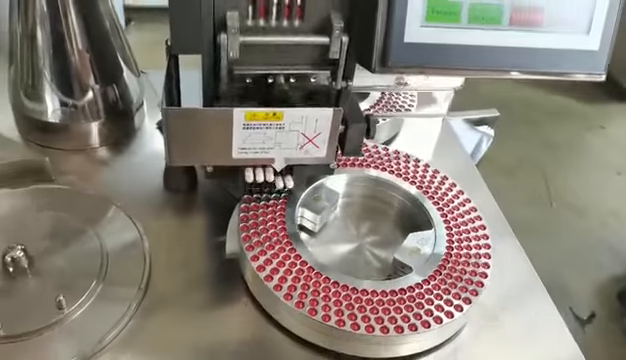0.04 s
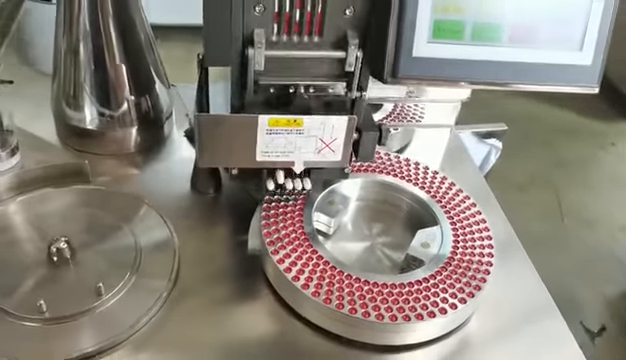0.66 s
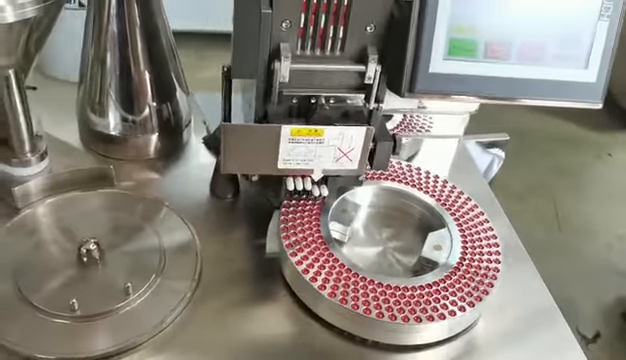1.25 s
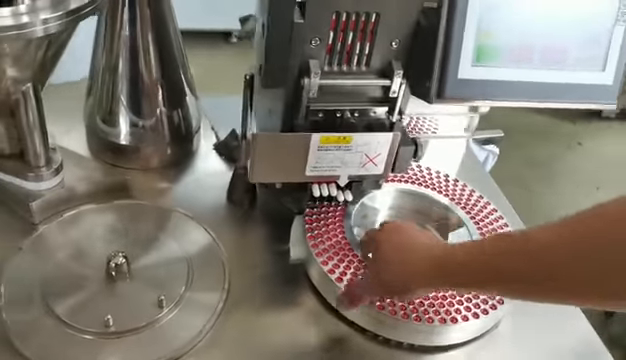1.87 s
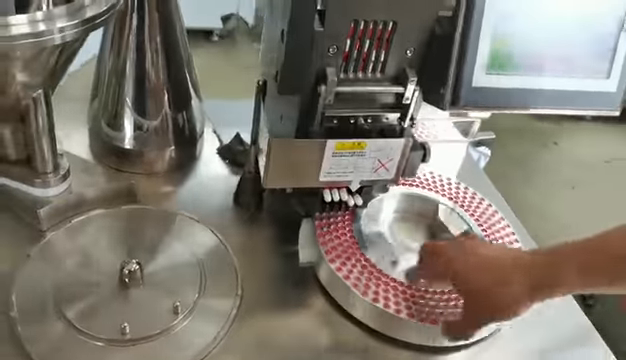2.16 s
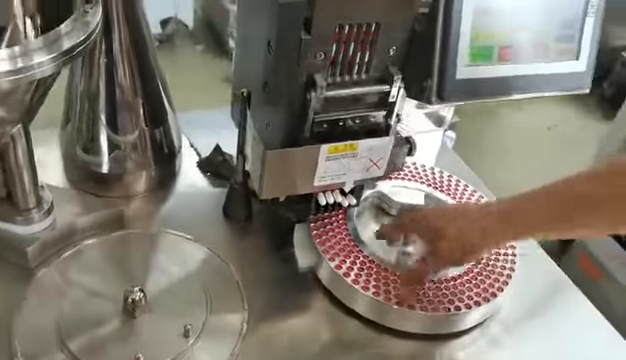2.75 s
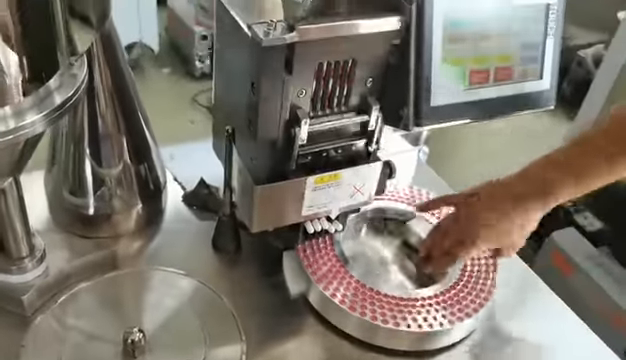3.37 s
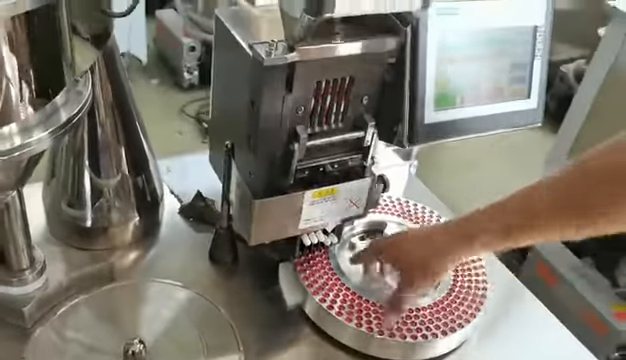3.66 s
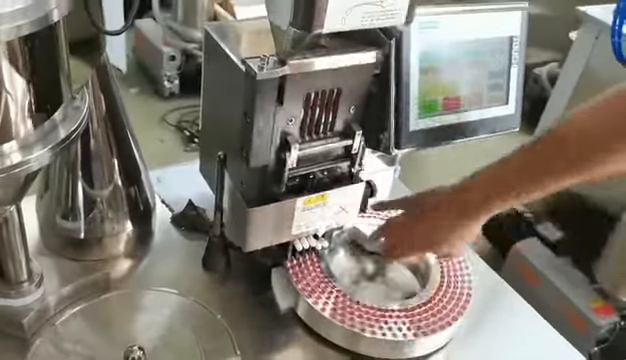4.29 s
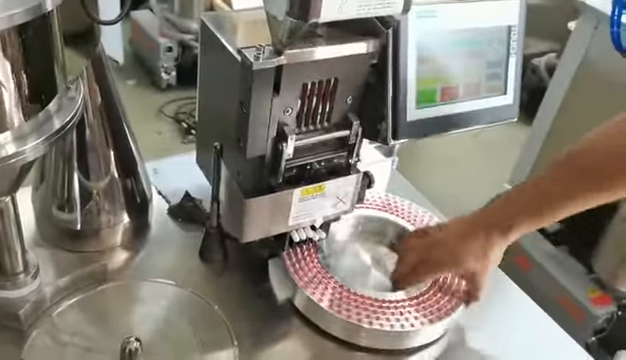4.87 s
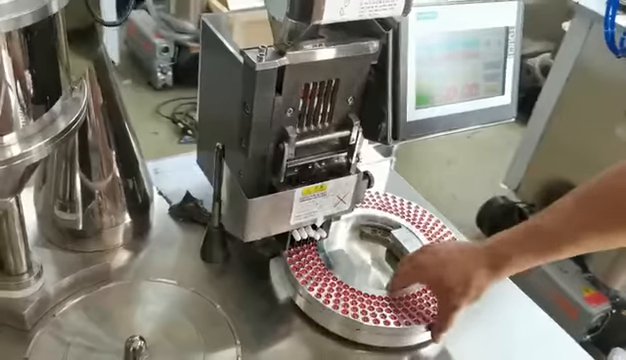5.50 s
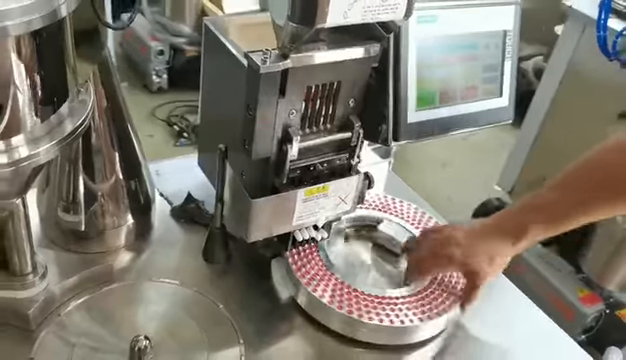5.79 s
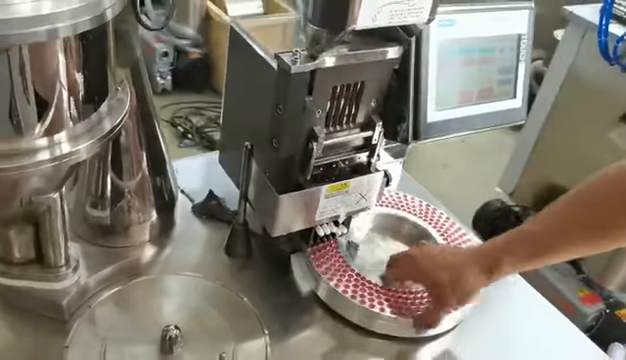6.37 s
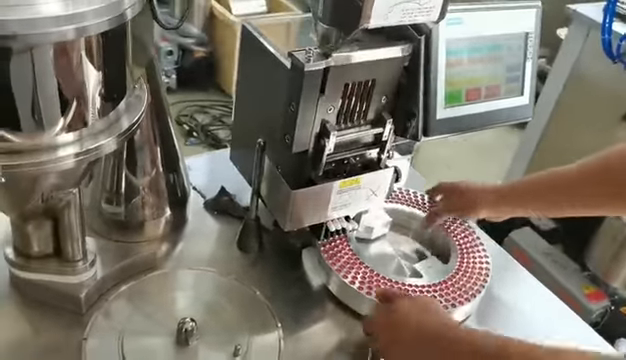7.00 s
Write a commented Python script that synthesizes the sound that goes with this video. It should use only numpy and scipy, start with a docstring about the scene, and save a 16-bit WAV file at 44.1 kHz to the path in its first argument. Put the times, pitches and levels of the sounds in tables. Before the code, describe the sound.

Capsules rattle in five bursts as a hand spins a metal plate, after a humming filling machine scrapes, clacks and squeals.

```python
"""A workshop, the microphone close to a humming capsule filling machine. In the first second the feed
slide makes two strokes, each a scrape along its guide, a few clacks and a thin squeal on the return.
From about three seconds a hand spins the loaded steel plate five times, and the capsules rattle in
their holes. The steel table booms softly under it all; its drone and the machine's hum grow a little
as the microphone moves in."""
import sys
import numpy as np
from scipy import signal
from scipy.fft import rfft, irfft
from scipy.io import wavfile
from scipy.ndimage import uniform_filter1d

SR = 44100
rng = np.random.default_rng(int(sys.argv[2]) if len(sys.argv) > 2 else 0)


def output_pcm(signal):
    """Save a mono or channel-first signal as 16-bit PCM at the path in sys.argv[1].

    Samples are clipped to [-1, 1] before scaling.
    """
    pcm = np.clip(np.atleast_2d(signal).T, -1, 1) * 32767
    wavfile.write(sys.argv[1], SR, np.round(pcm).astype(np.int16))


N = 314874
T = np.arange(N) / SR
HZ = np.fft.rfftfreq(N, 1 / SR)
TOP_HZ = 7535  # only the thin ticks reach above this

# How the room's sound leans at the microphone. Each row: frequency in Hz, left minus right in dB.
ROOM_BALANCE = [(30, -9), (70, 8.5), (150, 5), (280, 0.5), (600, 0), (1200, 1.5), (2300, 1), (4000, -3),
                (7000, -1)]


def capsule_rattle(rattle_db=2.5, ring_db=-5, roll_db=-12, rows_per_s=52):
    """Capsules chatter in the turning plate, in bunches as each row goes by, and set the steel ringing."""
    # Pushes of the hand. Each row: start, fastest moment and end in seconds, then rattle level,
    # rim ringing and treble lift in dB.
    spins = [(2.916, 3.152, 3.45, -22.5, -13, 2.5), (3.799, 3.968, 4.33, -20, -11.5, 3.5),
             (4.538, 4.69, 4.902, -21, -14.5, 1.5), (5.575, 5.725, 5.965, -19.5, -8, 4),
             (6.215, 6.44, 6.643, -19.5, -14.5, 2.5)]
    # Capsules in their holes. Each row: frequency in Hz, level in dB.
    capsule_colour = [(100, -7.5), (300, -31.5), (480, -11), (700, -16), (1200, -4), (1650, 3), (2100, 2.5),
                      (2900, -9), (3400, -2), (3900, -0.5), (4500, 5), (4800, 0), (5500, -1), (7400, 1.5)]
    # The plate's resonances. Each row: frequency in Hz, width in Hz, level in dB.
    plate_modes = [(2391, 86, 3), (2525, 50, 6), (2715, 160, 3.5), (2939, 71, 9.5), (3975, 150, .5),
                   (4250, 43, -2.5), (4360, 91, 0), (4550, 69, -3), (7090, 120, 0), (7230, 67, 3.5)]
    rim_mode = [(2982, 110, 0)]
    # The plate from the microphone. Each row: frequency in Hz, left minus right in dB.
    plate_balance = [(300, -3), (650, 9), (1500, 6), (2200, 2.5), (3000, 4), (5300, -1), (7300, 1.5)]
    # The plate rings as one body. Each row: frequency in Hz, left-right likeness from 0 to 1.
    plate_likeness = [(600, 0.044), (1500, .05), (2100, 0), (2450, 0.66), (2950, 0.49), (3300, .05),
                      (3900, 0.071), (4450, 0.2), (5200, .05), (7400, 0.37)]
    drive = np.sqrt(sum((amp(db) * push(start, fastest, end)) ** 2
                        for start, fastest, end, db, _, _ in spins))
    grip = [(fastest, rim_db, treble_db) for _, fastest, _, _, rim_db, treble_db in spins]
    speed = (drive / drive.max()) ** .3
    rows_passed = np.cumsum(rows_per_s * speed * (1 + .14 * wander(29))) / SR
    bunches = amp(.5 * np.cos(2 * np.pi * rows_passed) + .35 * wander(60))
    clicks = contacts((spins[0][0], T[-1]), per_s=2400, spread_db=2.6, t60=.012, likeness=.12,
                      ping_db=-4.5, ping_t60=.09, lead_spread_s=.00007)
    clicks = alike(bunches * patchy(clicks, depth_db=1.5), spectrum(plate_likeness))
    body = unit(shape(clicks, amp(spectrum(capsule_colour)) * sides(spectrum(plate_balance))))
    treble = shape(body, np.interp(HZ, [5200, 6400], [0, 1]))
    body = body + (amp(curve(grip, column=2)) - 1) * treble
    ring = amp(ring_db) * patchy(shape(clicks, resonances(plate_modes)), depth_db=1.5)
    rim = amp(curve(grip)) * unit(shape(clicks, resonances(rim_mode)))
    # The plate rumbles on its seat.
    roll = room_noise(resonances([(290, 150, -2.5), (579, 136, -1), (709, 102, 2.0), (1033, 160, 1)]))
    return drive * (amp(rattle_db) * unit(body + ring + rim) + amp(roll_db) * roll)


def push(start, fastest, end, settle_db_per_s=170.5, coast_db=-19.5, coast_fade_db_per_s=15):
    """Rattle strength for one push: the plate speeds up, is braked by the hand, settles and coasts."""
    progress = np.interp(T, [start, fastest, end], [0, .5, 1])
    arch_db = 20 * np.log10(abs(np.sin(np.pi * progress)) ** 0.698 + 1e-9)
    # The capsules can come to rest only so fast.
    settling_db = np.maximum.accumulate(arch_db + settle_db_per_s * T) - settle_db_per_s * T
    coast = progress * amp(coast_db - coast_fade_db_per_s * np.maximum(T - end, 0))
    return np.hypot(amp(settling_db), coast)


def slide_scrape(scrape_db=-6.5, edge_s=0.017, stop_db=4.5, stop_s=0.01):
    """Fine slips of the feed slide ring its guide, swelling just before the slide meets its stop."""
    # Feed strokes. Each row: start and end in seconds, level in dB.
    strokes = [(-.05, 0.164, -32), (0.503, 0.78, -33.5)]
    # The guide's resonances. Each row: frequency in Hz, width in Hz, level in dB.
    guide_modes = [(320, 16, 3.5), (927, 68, -10.5), (1180, 150, -14.5), (2120, 55, -2), (2660, 71, -5),
                   (3040, 56, -3), (3470, 110, -5), (3670, 150, -2), (3940, 260, 2), (4190, 340, 0),
                   (6900, 590, -6.5), (7560, 730, -3.5)]
    slips = contacts((0, 1), per_s=3200, spread_db=-1.5, t60=0.0031, likeness=0.4,
                     ping_db=-10, ping_t60=0.043)
    scrape = unit(shape(patchy(slips, depth_db=2.5), resonances(guide_modes)))
    travel = np.zeros(N)
    for start, end, db in strokes:
        moving = np.clip(np.minimum(T - start, end - T) / edge_s + .5, 0, 1)
        travel += moving * amp(db + stop_db * np.exp(-abs(end - T) / stop_s))
    return amp(scrape_db) * sides(2.5) * scrape * travel


def slide_squeal(squeal_db=1, pitch_hz=6447, pure_db=-4, width_hz=80, fade_db_per_s=56.5):
    """The returning slide sings on one high, rough note, to the right of the microphone."""
    # Returns of the slide. Each row: start and rise time in seconds, level in dB.
    squeals = [(.17, 0.075, -37.5), (.93, 0.023, -32)]
    carrier = np.exp(2j * np.pi * pitch_hz * T)
    note = np.array([(carrier * (amp(pure_db) + wander(width_hz) + 1j * wander(width_hz))).real
                     for channel in range(2)])
    swell = sum(np.clip((T - start) / rise, 0, 1)
                * amp(db - fade_db_per_s * np.maximum(T - start - rise, 0))
                for start, rise, db in squeals)
    return amp(squeal_db) * sides(-7) * unit(note) * swell


def clacks(clack_db=-2.5, neutral_db=-6, steel_db=6, rise_s=0.003):
    """The feed and the capsules strike in short, clattering contacts that ring the steel."""
    # Each row: start in seconds, level in dB, brightness in dB, decay in seconds.
    hits = [(0.136, -28.5, 12.5, 0.15), (0.156, -26, -5.5, 0.046), (.191, -23, -4.5, 0.069),
            (0.203, -34.5, -2.5, 0.065), (0.219, -35, -21, 0.1), (0.244, -32.5, -6, 0.023),
            (0.74, -29, 2, 0.11), (0.756, -21.5, 6, 0.033), (0.785, -34, 5, 0.062),
            (0.7966, -19, -1, 0.037), (.813, -25, 0, 0.014), (0.828, -35, -9, 0.11),
            (2.92, -26, -13.5, 0.072), (2.956, -23.5, -8, 0.033), (3.332, -28, 1, 0.026),
            (3.381, -32, -14, 0.051), (3.774, -24.5, -7, 0.13), (3.806, -23, -16, 0.046),
            (4.537, -24.5, -8, 0.055), (5.404, -29.5, -10, 0.1), (5.903, -27, -9, 0.025),
            (5.958, -27, -26, 0.058), (6.229, -24.5, -10, 0.079), (6.259, -22, -15, 0.026)]
    # A clack of neutral brightness. Each row: frequency in Hz, level in dB.
    clack_colour = [(150, -17), (600, -18), (1100, -21), (1600, -8.5), (2100, -2), (2700, -5), (3450, -4.5),
                    (4100, 4), (5200, -5), (7400, -6.5)]
    # Steel parts that ring along. Each row: frequency in Hz, width in Hz, level in dB.
    steel_modes = [(1520, 78, 3.5), (2120, 21, -8), (2796, 97, 1), (3400, 99, 6), (3850, 200, -9),
                   (4870, 110, 4.5), (7140, 120, -5)]
    out = np.zeros((2, N))
    for start, db, bright_db, t60 in hits:
        hit = burst(t60, likeness=0.29, lead_s=.00016)
        t, hz = np.arange(hit.shape[1]) / SR, np.fft.rfftfreq(hit.shape[1], 1 / SR)
        treble_db = (bright_db - neutral_db) * np.interp(hz, [3000, 6000], [0, 1])
        colour = amp(spectrum(clack_colour, hz) + treble_db) * (hz < TOP_HZ)
        hit = irfft(rfft(hit * (1 - np.exp(-t / rise_s))) * colour)
        onset_rms = np.sqrt(np.mean(hit[:, :256] ** 2))
        add(out, start, amp(db + clack_db) * hit / onset_rms)
    return sides(0.99) * (1.25 * out + amp(steel_db) * shape(out, resonances(steel_modes)))


def hand_knocks(knock_db=-7, tap_db=17, rise_s=0.00075):
    """The hand damps the plate as it strikes, so its modes die at once."""
    # Each row: start in seconds, level in dB, pitch factor.
    knocks = [(2.282, -15, 0.83), (2.285, -13.5, 0.94), (5.411, -15.5, 1.44), (5.558, -16, 0.88)]
    # The damped plate. Each row: frequency in Hz at pitch factor 1, level in dB, decay in seconds.
    damped_modes = [(964, -10, 0.032), (1283, -7, 0.073), (1750, -10, 0.043), (2376, -8, 0.06),
                    (2610, -3, 0.063), (2830, 0, 0.065), (3000, -3, 0.058), (3960, -10, 0.063),
                    (6300, -8, 0.051)]
    out, t = np.zeros((2, N)), np.arange(4096) / SR
    soft_skin = np.interp(np.fft.rfftfreq(len(t), 1 / SR), [500, 1200, 4000, 5000], [.2, .53, .42, .28])
    for start, db, pitch in knocks:
        ring = sum(amp(mode_db - 60 * t / t60)
                   * np.sin(2 * np.pi * (hz * pitch * t + rng.random() + .5 * rng.random((2, 1))))
                   for hz, mode_db, t60 in damped_modes)
        tap = irfft(rfft(burst(0.044, likeness=0.14, lead_s=0)) * soft_skin)
        add(out, start, amp(db + knock_db) * (1 - np.exp(-t / rise_s)) * (ring + amp(tap_db) * tap))
    return out


def thin_ticks(width_hz=520, t60=0.04, rise_s=0.0028):
    """Very bright ticks of narrow-band noise near 7.6 kHz, much louder in the left channel."""
    # Each row: start in seconds, level in dB, pitch in Hz.
    ticks = [(0.153, -20.5, 7440), (0.809, -24, 7600), (3.776, -24.5, 7810), (4.849, -17.5, 7710),
             (6.637, -16, 7530)]
    out, t = np.zeros((2, N)), np.arange(4096) / SR
    for start, db, hz in ticks:
        band = np.exp(-((np.fft.rfftfreq(len(t), 1 / SR) - hz) / width_hz) ** 2)
        fizz = unit(irfft(rfft(rng.standard_normal((2, len(t)))) * band))
        add(out, start, amp(db - 60 * t / t60) * (1 - np.exp(-t / rise_s)) * fizz)
    return sides(16.3) * out


def finger_brush():
    """Skin rubs the rim and stirs the plate's strongest mode."""
    # Each row: time in seconds, level in dB.
    rub = [(2.33, -62), (2.4, -49), (2.49, -45), (2.55, -57), (2.62, -52)]
    touching = uniform_filter1d(1. * ((T >= rub[0][0]) & (T <= rub[-1][0])), size=400)
    return sides(-4) * amp(curve(rub)) * touching * room_noise(resonances([(2920, 470, 0)]) ** 2)


def steel_table(rise_db_per_s=0.62, uneven_db=4.0, swell_rise_s=0.065, swell_fall_s=.11):
    """The table booms when jolted; its drone swells around each jolt and grows as the microphone nears."""
    # Jolts. Each row: start in seconds, boom level in dB, pitch in Hz, decay in seconds, swell in dB.
    jolts = [(0.125, -12.5, 182, 0.1, -49), (.15, -33, 54.7, 0.24, -34.5), (0.759, -20, 60, 0.11, -54),
             (.8, -33, 45.2, 0.17, -58), (1.464, -14.5, 168.5, 0.14, -59),
             (1.549, -11.5, 164, 0.092, -38.5), (2.829, -24, 154, 0.11, -39.5), (3.298, -20, 150, .12, -36),
             (4.039, -17, 167.4, 0.27, -25.5), (4.293, -8, 151, 0.12, -23.5), (4.492, -26, 149, 0.084, -26),
             (4.86, -20, 153, 0.11, -33), (5.388, -22, 166.3, 0.25, -27), (5.661, -12, 196, 0.11, -53),
             (6.698, -20, 173, 0.24, -26)]
    # The drone. Each row: frequency in Hz, level in dB.
    drone_colour = [(40, -31.5), (95, -29.5), (138, 0.5), (172, 0), (205, -1.5), (250, -13.5), (400, -20.5),
                    (900, -21.5), (3000, -69.5)]
    drone_power = amp(-40.5 + rise_db_per_s * T + uneven_db * wander(5)) ** 2
    booms, t = np.zeros((2, N)), np.arange(SR // 2) / SR
    for start, db, hz, t60, swell_db in jolts:
        boom = amp(db - 60 * t / t60) * (1 - np.exp(-t / 0.019)) * np.sin(2 * np.pi * hz * t)
        add(booms, start, sides(2.6) * boom)
        swell_s = np.where(T < start, swell_rise_s, swell_fall_s)
        drone_power += amp(swell_db) ** 2 * np.exp(-((T - start) / swell_s) ** 2)
    return booms + amp(-3.5) * np.sqrt(drone_power) * room_noise(amp(spectrum(drone_colour)))


def motor_and_fan(waver_hz=0.747, flutter_db=4.0, air_db=-36.5, air_rise_db_per_s=0.8344):
    """Motor and pump hum in wavering tones; the fan adds a fuzzy whine and rushing air."""
    # Motor and pump tones. Each row: frequency in Hz, level in dB.
    tones = [(72.8, -51), (96.5, -51), (145.8, -44), (193.5, -50.5), (283, -54.5)]
    # Rushing air. Each row: frequency in Hz, level in dB.
    air_colour = [(20, -9), (55, -1.5), (110, 10.5), (200, 2.5), (320, -0.5), (600, -9.5), (1000, -4.5),
                  (1700, -7.5), (3600, -7), (5200, -3), (6200, -2.5), (7500, -5)]
    # Levels as the microphone moves. Each row: time in seconds, hum gain in dB, whine level in dB.
    nearness = [(0, -0.5, -51), (1.3, -5.5, -56), (2.1, 1.5, -51.5), (4.5, 0, -46), (7.14, 4, -46.5)]
    hum = np.zeros((2, N))
    for hz, db in tones:
        gain = amp(db + flutter_db * wander(31)) * sides(spectrum(ROOM_BALANCE, hz))
        phase = 2 * np.pi * np.cumsum(hz + waver_hz * wander(3.84)) / SR
        hum += gain * np.sqrt(2) * np.sin(phase)
    swell_db, flicker_db = 2.2 * wander(8), .6 * wander(30)
    whine = amp(curve(nearness, column=2) + swell_db) * room_noise(resonances([(1217, 57, 0)]) ** 2)
    rush = patchy(room_noise(amp(spectrum(air_colour))), depth_db=3.0)
    air = amp(air_db + air_rise_db_per_s * T + flicker_db) * rush
    return amp(curve(nearness)) * hum + whine + air


def workshop_echo(x, t60_low, t60_high):
    """Sparse reflections whose treble dies sooner than their bass."""
    taps = rng.choice([-1., 1.], (2, SR)) * (rng.random((2, SR)) < 1 / 16) * (np.arange(SR) > SR // 200)
    hz, t, bands = signal.stft(taps, SR, nperseg=256)
    t60 = np.interp(hz, [0, TOP_HZ], [t60_low, t60_high])[:, None]
    tail = signal.istft(bands * amp(-60 * t / t60), SR, nperseg=256)[1]
    return signal.fftconvolve(x, tail / np.linalg.norm(tail[0]), axes=1)[:, :N]


def room_noise(gain):
    """Coloured noise in the room: alike on both sides in the bass, unrelated in the treble."""
    # Each row: frequency in Hz, left-right likeness from 0 to 1.
    room_likeness = [(30, 0.86), (120, 0.57), (260, 0.92), (500, 0.85), (1000, 0.31), (2000, 0), (7000, 0)]
    pair = alike(rng.standard_normal((2, N)), spectrum(room_likeness))
    return unit(shape(pair, gain * sides(spectrum(ROOM_BALANCE))))


def contacts(span, per_s, spread_db, t60, likeness, ping_db, ping_t60, lead_spread_s=.00003, count=200):
    """Many small, uneven contacts; each kind ticks and pings at a pitch and a place of its own."""
    t = np.arange(1536) / SR
    pitches, kinds = np.linspace(900, TOP_HZ, count), []
    for hz, lead_s in zip(pitches, .00016 + lead_spread_s * rng.standard_normal(count)):
        ping = np.sin(2 * np.pi * hz * (t - np.array([[0], [lead_s]]))) * amp(-60 * t / ping_t60)
        tick = burst(t60, likeness, lead_s, size=len(t))
        kinds.append(tick + amp(ping_db) * ping / np.linalg.norm(ping[0]))
    strength = amp(spread_db * np.minimum(rng.exponential(1, N), 3))
    kind = rng.integers(0, count, N)
    during = (T >= span[0]) & (T <= span[1])
    out = np.zeros((2, N))
    for i in np.flatnonzero((rng.random(N) < per_s / SR) & during):
        add(out, i / SR, strength[i] * kinds[kind[i]])
    return unit(out)


def burst(t60, likeness, lead_s, size=4096):
    """One contact: a sharp tick and its scatter off nearby steel, lead_s earlier on the left."""
    t = np.arange(size) / SR
    shared, left, right = rng.standard_normal((3, size)) * amp(-60 * t / t60)
    direct = np.array([shared, np.interp(t - lead_s, t, shared, left=0)])
    pair = np.sqrt(likeness) * direct + np.sqrt(1 - likeness) * np.array([left, right])
    return pair / np.linalg.norm(pair[0])


def patchy(x, depth_db):
    """Colour that drifts at random, a few hundred hertz and some tens of milliseconds at a time."""
    bands = signal.stft(x, nperseg=1024)[2]
    patches = uniform_filter1d(rng.standard_normal(bands.shape[1:]), size=5, axis=0)
    patches = unit(uniform_filter1d(patches, size=5, axis=1))
    return unit(signal.istft(bands * amp(depth_db * patches), nperseg=1024)[1][:, :N])


def wander(rate_hz, step=32):
    """A smooth random drift of rms 1."""
    coarse = T[::step]
    hz = np.fft.rfftfreq(len(coarse), step / SR)
    slow = irfft(rfft(rng.standard_normal(len(coarse))) * np.exp(-(hz / rate_hz) ** 2), len(coarse))
    return np.interp(T, coarse, unit(slow))


def resonances(modes):
    """Frequency response of a set of modes, alternating in sign."""
    return sum((-1) ** k * amp(db) / (1 + 1j * (HZ ** 2 - hz ** 2) / (HZ * width + 1e-9))
               for k, (hz, width, db) in enumerate(modes))


def alike(pair, likeness):
    """Gives the right channel a share of the left."""
    left, right = pair
    return np.array([left, shape(left, likeness) + shape(right, np.sqrt(1 - likeness ** 2))])


def sides(db):
    """Left and right gains for a level difference, left minus right."""
    return amp(np.array([[.5], [-.5]]) * db)


def spectrum(rows, hz=HZ):
    """Reads a table along a log-frequency axis."""
    row_hz, value = np.transpose(rows)
    return np.interp(np.log(hz + 1), np.log(row_hz + 1), value)


def curve(rows, column=1):
    """One column of a time table at every sample."""
    rows = np.array(rows)
    return np.interp(T, rows[:, 0], rows[:, column])


def shape(x, gain):
    """Filters by a gain for each frequency."""
    return irfft(rfft(x) * gain, N)


def add(mix, start_s, sound):
    """Mixes a sound in at a time."""
    part = mix[..., max(round(start_s * SR), 0):][..., :sound.shape[-1]]
    part += sound[..., :part.shape[-1]]


def amp(db):
    """Decibels to gain."""
    return 10 ** (np.asarray(db) / 20)


def unit(x):
    """Scales to rms 1."""
    return x / np.sqrt(np.mean(x ** 2) + 1e-20)


def scene():
    """Machine and plate close to the microphone, with the workshop's reflections behind."""
    near = slide_scrape() + slide_squeal() + capsule_rattle() + clacks() + finger_brush()
    echo = amp(-10.5) * workshop_echo(near, t60_low=.55, t60_high=.35)
    mix = near + echo + hand_knocks() + motor_and_fan() + steel_table()
    treble_cut = np.clip((TOP_HZ - HZ) / 100 + .5, 0, 1)
    return shape(mix, treble_cut) + thin_ticks()


def record(dry):
    """A steep low-pass at 8780 Hz."""
    lowpass = signal.firwin(511, 8780, window=("kaiser", 9), fs=SR)
    return signal.oaconvolve(dry, lowpass[None], "same")


dry = scene()
out = record(dry)
output_pcm(out)
```